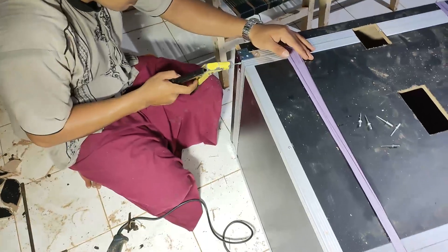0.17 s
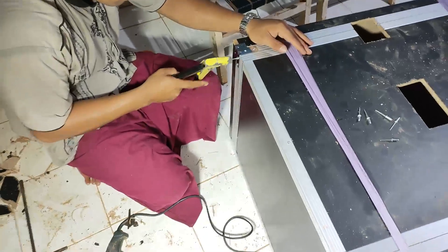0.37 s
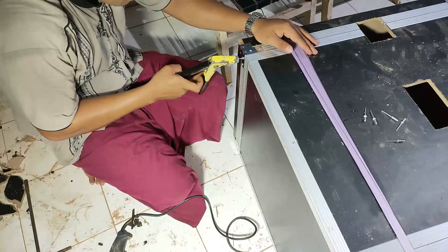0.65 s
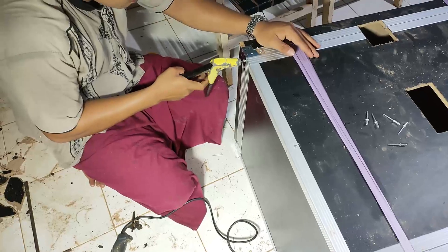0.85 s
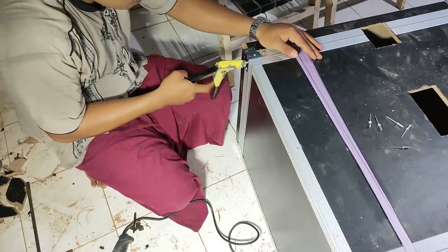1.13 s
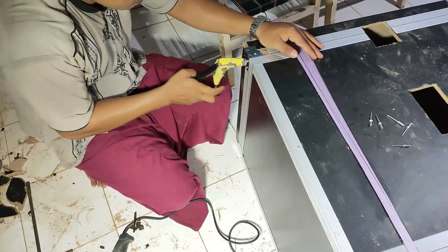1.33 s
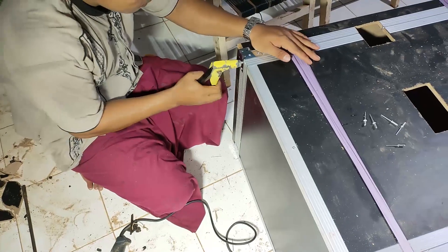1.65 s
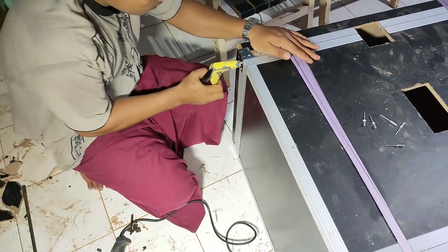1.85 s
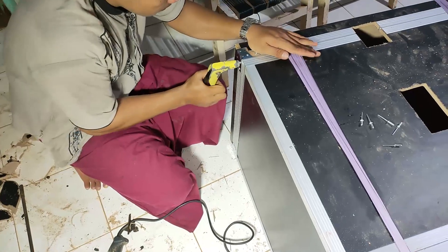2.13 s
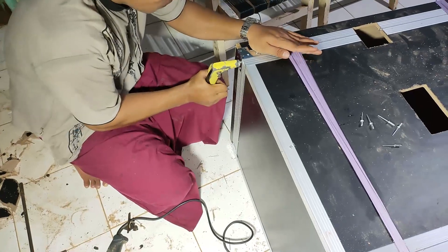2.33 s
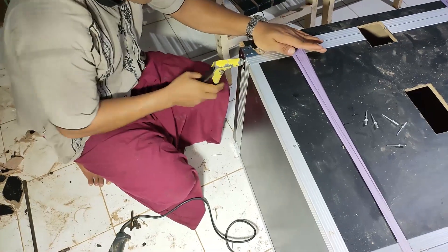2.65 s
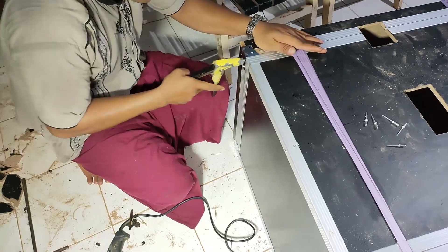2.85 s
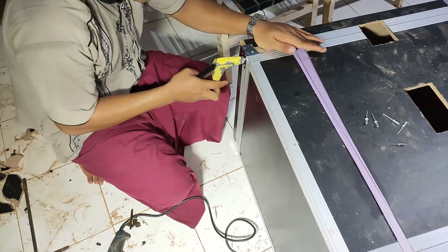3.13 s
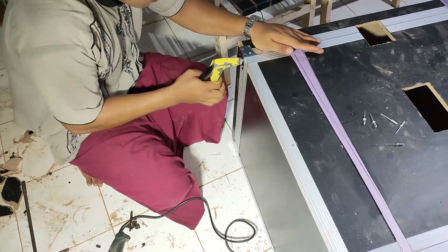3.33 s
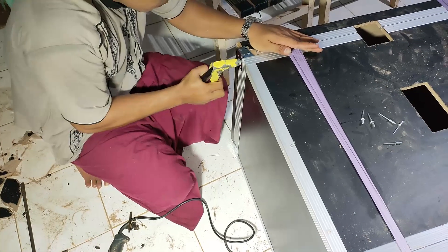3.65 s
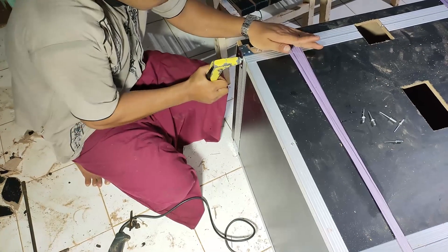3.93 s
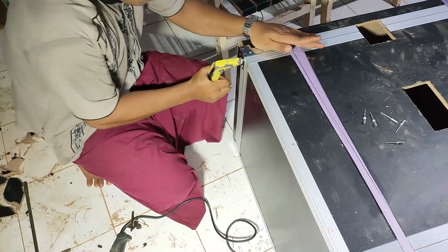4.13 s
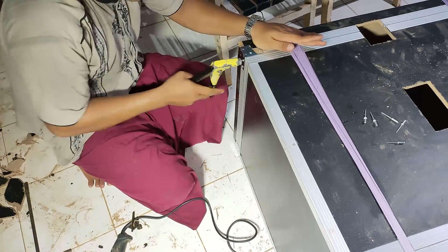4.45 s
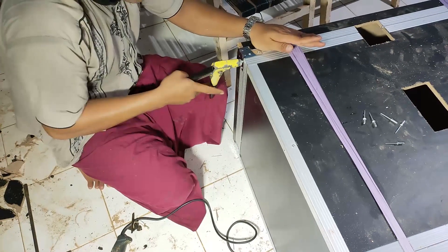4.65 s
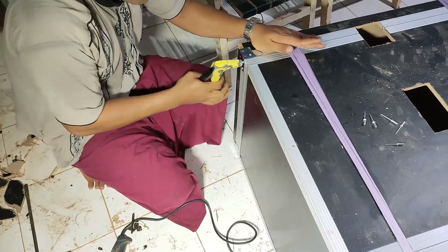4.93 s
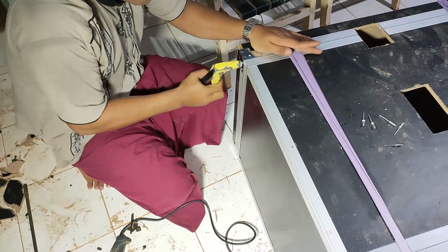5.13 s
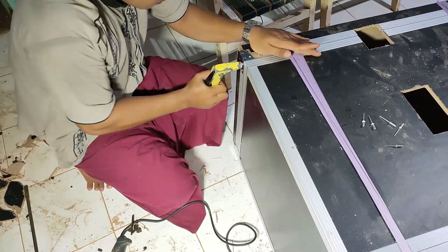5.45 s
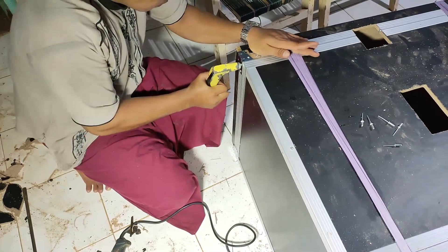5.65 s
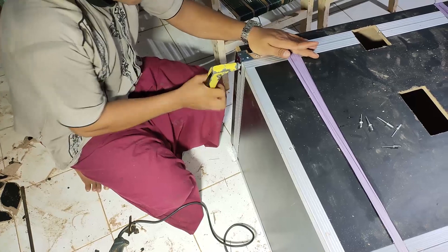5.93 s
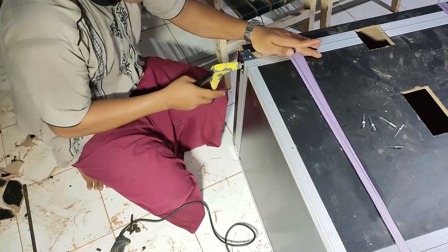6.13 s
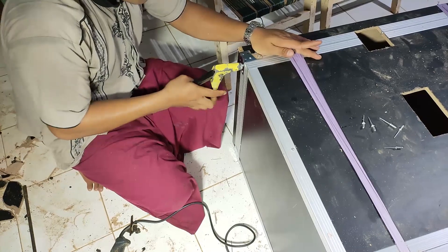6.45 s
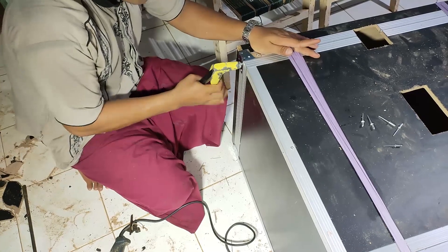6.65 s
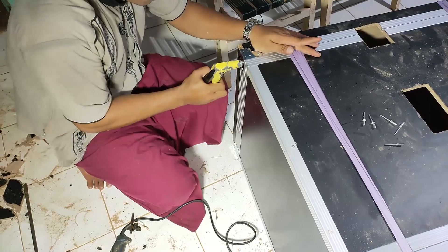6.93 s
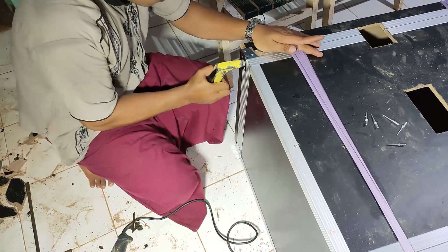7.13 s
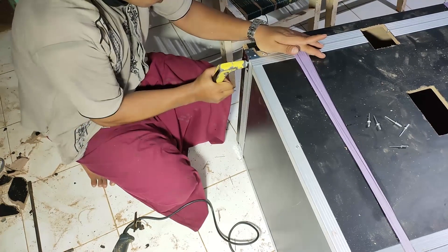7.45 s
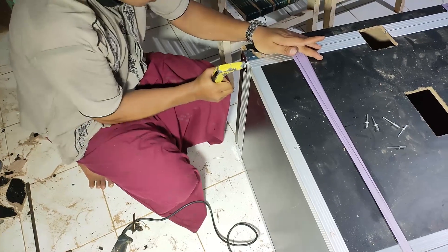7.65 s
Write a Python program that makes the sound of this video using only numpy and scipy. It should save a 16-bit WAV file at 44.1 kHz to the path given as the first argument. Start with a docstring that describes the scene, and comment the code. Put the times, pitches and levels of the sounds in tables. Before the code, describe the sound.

Indoors, close stereo, a faint narrow high hiss like insects and quiet room air run throughout. At 0.1 and 0.3 seconds come firm metallic clacks, with finger rustle and a thin, very high pin jingle to the right until 0.9. From 1 to 2 seconds there are small dry ticks, clustered around 1.4 to 1.7. Clanky clicks gather from 2.4, ending in a stronger clack at 3.0. At 3.5 a dull, hollow panel thump booms, with faint high squeaks around 3.6 to 4.3. A click falls at 4.2, then a rapid clatter at 4.6 to 4.8 leads to a very loud, bright snap at 4.9. Soft pushes, rubbing and a faint squeak follow near 5.4, with clicks at 5.9. Clicks from 6.3 precede a second equally loud snap at 6.6. Afterwards only a soft push, a weak squeak, tiny ticks around 7.2 and light clicks at 7.4 and 7.6 remain.

```python
"""Hand rivet tool on a hollow cabinet

A hand rivet tool is squeezed against a metal edge profile on a hollow cabinet, indoors.
Jaws, handles and mandrel click and snap: noise bursts through resonances, with rattle and room tail.
The panel booms and a thin pin rings as decaying sines; the hand rubs as grainy noise; the pivot squeaks
as gliding tones. A band of insect-like hiss and quiet room air, both shaped noise, lie under it."""
import sys
import numpy as np
from scipy import signal
from scipy.fft import rfft, irfft
from scipy.io import wavfile
from scipy.ndimage import uniform_filter1d

SR = 44100
rng = np.random.default_rng(int(sys.argv[2]) if len(sys.argv) > 2 else 0)


def wav_out(sig):
    """Save sig, one row per channel (or a flat mono array), as 16-bit PCM at SR to the path in sys.argv[1]."""
    wavfile.write(sys.argv[1], SR, np.round(np.clip(np.atleast_2d(sig).T, -1, 1) * 32767).astype(np.int16))


N = 343098


def gain_of(db):
    """Decibels to amplitude."""
    return np.exp(np.asarray(db) * (np.log(10) / 20))


def evened(x):
    """Scales to rms 1."""
    return x / np.sqrt(np.mean(x ** 2) + 1e-20)


def smooth_noise(shape, size):
    """Noise of rms 1, averaged over size steps of the last axis."""
    return evened(uniform_filter1d(rng.standard_normal(shape), size=size))


def read(points, hz):
    """Reads a table on a log-frequency axis."""
    f, value = np.transpose(points)
    return np.interp(np.log(hz + 1), np.log(f + 1), value)


def add(mix, s, sound):
    """Mixes a sound in at time s."""
    part = mix[..., round(s * SR):][..., :sound.shape[-1]]
    part += sound[..., :part.shape[-1]]


def sides(db):
    """Left and right gains for a left-right difference."""
    return gain_of(np.array([db / 2, -db / 2]))


def stereo(left, other, same, hz):
    """Left and right spectra that share as much as the likeness table says."""
    like = np.clip(read(same, hz), -1, 1).reshape((-1,) + (1,) * (left.ndim - 1))
    return np.array([left, like * left + np.sqrt(1 - like ** 2) * other])


def hiss(spectrum, same, balance, patchy_db, size):
    """Two-channel noise of rms 1 with drifting patches in time and pitch."""
    hop, hz = size // 4, np.fft.rfftfreq(size, 1 / SR)
    a, b, c, d, patches = rng.standard_normal((N // hop + 5, len(hz), 5)).T
    patches = uniform_filter1d(patches, size=9, axis=0)
    patches = evened(uniform_filter1d(patches, size=9, axis=1))
    z = stereo(a + 1j * b, c + 1j * d, same, hz)
    z = z * gain_of(read(spectrum, hz)[:, None] + patchy_db * patches)
    z = z * sides(read(balance, hz))[:, :, None]
    return evened(signal.istft(z, nperseg=size, noverlap=size - hop)[1][:, :N])


BUILD_CYCLES, SLUGGISH_HZ = 0.59, 88  # cycles a mode needs to build; modes under this pitch need more


def ring(modes, db, scatter_db):
    """One blow on a set of decaying modes; where it lands changes each mode's share."""
    t = np.arange(2 * SR // 5) / SR
    hz, mode_db, t60_s = np.transpose(modes)[:, :, None]
    share_db = db + mode_db + scatter_db * rng.standard_normal(hz.shape)
    build_s = BUILD_CYCLES * (1 + (SLUGGISH_HZ / hz) ** 2) / hz
    swell = (1 - np.exp(-t / build_s)) ** 2
    return (gain_of(share_db - 60 * t / t60_s) * swell * np.sin(2 * np.pi * hz * t)).sum(0)


# room air spectrum: (frequency [Hz], relative density [dB/Hz])
AIR_SPECTRUM = [(26, -24), (45, -5.5), (130, -14), (290, -19), (465, -13), (550, -4.5), (680, -11),
                (800, -18), (1400, -20.5), (2200, -7), (2900, -19), (4100, -57), (9000, -30.5),
                (15800, -25)]
# background likeness of the channels: (frequency [Hz], likeness [-1..1])
AIR_LIKENESS = [(60, 1), (300, 0.57), (700, 0.14), (1400, 0.018)]
# background balance: (frequency [Hz], left-right difference [dB])
AIR_TILT = [(60, -5), (550, 1.5), (1650, -4.5), (4500, 0.5), (6500, -3.5), (9000, -7.5), (14000, 2)]
AIR_DB = -58


def room_air():
    """Steady shaped noise, slightly patchy."""
    return gain_of(AIR_DB) * hiss(AIR_SPECTRUM, AIR_LIKENESS, AIR_TILT, patchy_db=2.2, size=1024)


# insect-like hiss spectrum: (frequency [Hz], relative density [dB/Hz])
BAND_SPECTRUM = [(5200, -20), (5700, -7.5), (6250, 0), (6700, 2), (7400, 1.5), (7750, -8), (8100, -22),
                 (8600, -45)]
BAND_DB = -49.5


def hiss_band():
    """Steady noise confined to a narrow treble band."""
    return gain_of(BAND_DB) * hiss(BAND_SPECTRUM, AIR_LIKENESS, AIR_TILT, patchy_db=1.8, size=1024)


# room decay: (frequency [Hz], t60 [s])
ROOM_T60 = [(300, 0.19), (1800, 0.32), (5000, 0.36), (13000, 0.2)]


def room(x):
    """Dense taps of random sign in clumps and patches of pitch, each band dying at its own speed."""
    taps = rng.standard_normal((2, SR // 2))
    taps = taps * gain_of(1.2 * smooth_noise(taps.shape, 130))
    taps = taps * np.clip((np.arange(SR // 2) / SR - .004) / 0.00044, 0, 1)  # silent for 4 ms
    hz, t, z = signal.stft(taps, SR, nperseg=256)
    patches = uniform_filter1d(rng.standard_normal(z.shape), size=3, axis=1)
    patches = evened(uniform_filter1d(patches, size=5, axis=2))
    decay = gain_of(3.5 * patches - 60 * t / read(ROOM_T60, hz)[:, None])
    tail = signal.istft(z * decay, SR, nperseg=256)[1]
    tail = tail / np.linalg.norm(tail, axis=1, keepdims=True)
    return signal.fftconvolve(x, tail, axes=1)[:, :N]


# cabinet panel modes: (frequency [Hz], relative level [dB], t60 before damping [s])
PANEL_MODES = [(54.4, 4, 0.39), (66.4, -10, 0.52), (85.8, -4.5, 0.46), (110.6, -2, 0.27), (126.6, 6, 0.2),
               (179, -14.5, 0.29), (243, -16.5, 0.37), (281, -1.5, 0.21), (347.7, -4, 0.11),
               (367.3, -12.5, 0.34), (436.7, -4, 0.16), (481.5, -16, 0.52), (541.5, -2, 0.085),
               (681, -9, 0.24), (828, -7, 0.099)]
DAMPING, HARDEST_DB = 0.12, -19  # dB of ring time lost per dB of boxy level below HARDEST_DB
BOOM_SCATTER_DB = 1.8


def boom(deep_db, boxy_db, lowest_db=0, upper_db=-8.0):
    """A blow shared among lowest, deep, boxy and upper panel modes; weak blows die sooner above 100 Hz."""
    hz = np.transpose(PANEL_MODES)[0][:, None]
    shares = [(70, deep_db + lowest_db), (110, deep_db), (140, deep_db),
              (200, boxy_db), (300, boxy_db), (430, boxy_db + upper_db)]
    lasting = gain_of(DAMPING * np.clip(boxy_db - HARDEST_DB, -30, 0))
    modes = [(f, db, t60_s * (lasting if f > 100 else 1)) for f, db, t60_s in PANEL_MODES]
    return ring(modes, read(shares, hz), scatter_db=BOOM_SCATTER_DB)


def shaken(steady_db, blows_db, db, rise_s, t60_s):
    """Gain over time: the hand's steady level plus, in power, a swell and decay after each click."""
    t, power = np.arange(SR) / SR, gain_of(steady_db) ** 2
    shape = (1 - np.exp(-t / rise_s)) * gain_of(db - 60 * t / t60_s)
    for (s, *_), blow_db in zip(CLICK_EVENTS, blows_db):
        add(power, s, (gain_of(blow_db) * shape) ** 2)
    return np.sqrt(power)


# steady hand noise on tool and cabinet: (time [s], palm drag level [dB], finger rustle level [dB])
HAND_LEVELS = [(0.0, -55, -46.5), (0.119, -69, -50), (.26, -57, -49), (.55, -67.5, -61), (1.15, -65.5, -61),
               (1.34, -78, -49), (1.6, -90, -50.5), (1.9, -61, -56.5), (2.25, -63.5, -56.5),
               (2.6, -64.5, -67), (2.9, -49.5, -56.5), (3.3, -64, -61.5), (3.65, -62, -51.5),
               (3.96, -65, -62), (4.58, -63, -61.5), (4.61, -54, -60), (4.66, -58, -61), (4.81, -57, -71),
               (5.1, -55.5, -67), (5.4, -67, -60), (5.45, -54.5, -55), (5.61, -57, -58),
               (5.701, -66.5, -64.5), (6.2, -64, -61.5), (6.33, -56, -55), (6.5, -52.5, -55),
               (7.21, -64.5, -63.5), (7.4, -69, -65), (7.78, -61, -68)]
# palm drag spectrum: (frequency [Hz], relative density [dB/Hz])
DRAG_SPECTRUM = [(88, -46), (150, -17.5), (254, -8.5), (836, -17), (1500, -22.5), (1860, -24), (2670, -24),
                 (5500, -34), (7150, -49), (12100, -120)]
# finger rustle spectrum: (frequency [Hz], relative density [dB/Hz])
RUSTLE_SPECTRUM = [(1500, 3), (3000, -0.5), (6000, 5), (10000, 5), (15000, 2.5)]
# likeness of the channels, rustle, drag and clicks: (frequency [Hz], likeness [-1..1])
NEAR_LIKENESS = [(300, 0.71), (1400, 0.24), (3000, 0.088), (15000, 0.016)]
# balance of rustle and clicks: (frequency [Hz], left-right difference [dB])
NEAR_TILT = [(300, -5), (650, -1), (1300, -2.5), (3200, -2.5), (4500, 1.5), (6500, -9.5), (9000, 6.5),
             (14000, -4.5)]
CREAK_DB, CREAK_SLOPE = -68, 1.37  # creak at a palm drag of -62 dB; dB per dB of drag


def hand():
    """Pressure creaks in the panel modes; palm and fingers catch and slip in grains."""
    s, *levels = np.transpose(HAND_LEVELS)
    drag_db, rustle_db = (np.interp(np.arange(N) / SR, s, c) for c in levels)
    creak_db = CREAK_DB + CREAK_SLOPE * (drag_db + 62)
    _, peak_db, _, _, _, boxy_db, *_ = np.transpose(CLICK_EVENTS)
    panel = boom(-28.5, -26.5, upper_db=-16.0)[:SR // 8]
    creak = signal.oaconvolve(rng.standard_normal(N), panel)[:N]
    slip_db = 2.2 * smooth_noise(N, 70)
    grain = smooth_noise(N, 70)
    grain_db = 0.3 * grain + 2.7 * np.maximum(grain - 1, 0)
    drag = hiss(DRAG_SPECTRUM, NEAR_LIKENESS, [(1, -1.), (2, 0.72)], patchy_db=3.0, size=512)
    rustle = hiss(RUSTLE_SPECTRUM, NEAR_LIKENESS, NEAR_TILT, patchy_db=4.5, size=256)
    drag, rustle = gain_of(slip_db) * drag, gain_of(grain_db) * rustle
    creak_gain = shaken(creak_db, boxy_db, db=-10, rise_s=0.027, t60_s=0.43)
    drag_gain = shaken(drag_db, peak_db, db=-37, rise_s=0.002, t60_s=0.46)
    rustle_gain = shaken(rustle_db, peak_db, db=-32.5, rise_s=0.0087, t60_s=0.4)
    return creak_gain * evened(creak) + drag_gain * evened(drag) + rustle_gain * evened(rustle)


ARCH_FLATNESS = 3.8  # power of the pitch arch
SQUEAK_FADE, SQUEAK_FLICKER_DB = 0.11, 4  # share of the length spent fading; rms flicker


def whistle(length_s, first_hz, last_hz, arch_hz, db, waver):
    """A thin tone arching over a straight glide, its pitch wavering and its level flickering."""
    u = np.arange(0, length_s, 1 / SR) / length_s
    arch = 1 - abs(2 * u ** .85 - 1) ** ARCH_FLATNESS
    hz = first_hz + (last_hz - first_hz) * u + arch_hz * arch
    wobble = 1 + waver * (smooth_noise(len(u), 60) + .4 * smooth_noise(len(u), 1500))
    x = np.sqrt(2) * np.sin(2 * np.pi * np.cumsum(hz * wobble) / SR)
    flicker_db = SQUEAK_FLICKER_DB * smooth_noise(len(u), 500)
    return gain_of(db + flicker_db) * x * signal.windows.tukey(len(u), SQUEAK_FADE)


# squeaks as the handles close: (start [s], length [s], first pitch [Hz], last pitch [Hz],
# arch height [Hz], level [dB], quick pitch waver [share of pitch])
SQUEAKS = [(3.58, .22, 12000, 15200, 500, -65, 0.016), (3.92, 0.38, 8500, 9200, 3550, -64.5, 0.0089),
           (5.42, 0.23, 10000, 11600, 900, -68, .022), (6.97, 0.18, 9900, 10200, 450, -69, 0.031)]


def pivot():
    """Faint friction squeaks, slightly right of centre."""
    out = np.zeros(N)
    for s, *row in SQUEAKS:
        add(out, s, whistle(*row))
    return out * sides(-0.97)[:, None]


# loose mandrel jingling in the nose: (time [s], level [dB])
JINGLE_EVENTS = [(0.15, -41), (.175, -45), (0.427, -34.5), (0.663, -39), (.74, -46), (0.802, -46),
                 (.855, -55)]
# mandrel modes: (frequency [Hz], relative level [dB], t60 [s])
PIN_MODES = [(15610, -3, 0.09), (15540, 0, .14), (15470, -4, .11), (15050, -16, 0.05)]
# faint short tones of the mandrel and other metal parts: (time [s], level [dB], frequency [Hz], t60 [s])
TING_EVENTS = [(.428, -43, 5830, .25), (.976, -50, 2180, 0.38), (1.7, -45, 2750, 0.13),
               (2.25, -57, 1670, 0.15), (2.26, -60, 3200, .1), (3.82, -57, 765, 0.47),
               (6.283, -51, 1135, .1), (6.8, -55, 1430, 0.18), (7.15, -49, 1950, 0.087),
               (7.189, -55, 1950, .08), (7.219, -53, 1950, .08), (7.259, -58, 1950, .08)]
PIN_ROOM_DB = -1.5


def mandrel():
    """The thin steel pin rings high, mostly right; it and other metal parts ting faintly; all rattle."""
    pin, tings = np.zeros(N), np.zeros(N)
    for s, db in JINGLE_EVENTS:
        add(pin, s, ring(PIN_MODES, db, scatter_db=1.5))
    for s, db, hz, t60_s in TING_EVENTS:
        add(tings, s, ring([(hz, 0, t60_s)], db, scatter_db=1.2))
    flutter = gain_of(3 * smooth_noise(N, 250))
    pin = pin * flutter * sides(-14.0)[:, None]
    return pin + gain_of(PIN_ROOM_DB) * room(pin) + tings * flutter * sides(-7.0)[:, None]


RATTLE_DB, RATTLE_T60_S, BOUNCES_PER_S = -5, 0.12, 450  # level against the pulse; decay; rate per draw
RATTLE_TINT_DB = 5  # rms spread of the tint


def rattle(pulse):
    """Loose parts make uneven small bounces after a click; each rattle favours its own few short rings."""
    t = np.arange(SR // 10) / SR
    chance, size, sign = rng.random((3, 2, len(t)))
    hits = (chance < BOUNCES_PER_S / SR) * (t > .007) * np.sign(sign - .5)
    bounces = hits * gain_of(-60 * t / RATTLE_T60_S - 16 * size)
    bounces = bounces + 0.6 * bounces[::-1]  # each side leaks into the other
    tint = evened(gain_of(RATTLE_TINT_DB * smooth_noise(513, 7)))
    return gain_of(RATTLE_DB) * signal.fftconvolve(bounces, irfft(rfft(pulse) * tint), axes=1)


# resonances of profile and tool head: (frequency [Hz], width, at least 120 used [Hz], level [dB])
PROFILE_RINGS = [(1340, 83, 0), (1707, 285, 4.5), (2285, 470, 3.5), (2920, 390, -8.5), (3310, 200, -8.5),
                 (3900, 53, -11), (4350, 230, -13), (4860, 130, 0.5), (5590, 73, 2.5), (6500, 110, 2.5),
                 (7360, 640, 3), (9400, 360, -4.5), (10200, 260, -11), (14600, 240, -5)]
# colour shared by all clicks: (frequency [Hz], level [dB])
CLICK_COLOUR = [(850, 0), (1200, -2.5), (2000, -4), (3200, 2), (4200, 5), (5500, 2.6), (8000, 6),
                (13000, 5)]
# colour shift of blows above HARD_DB: (frequency [Hz], slope [dB per dB of excess])
HARD_COLOUR = [(900, -0.28), (1400, 0.65), (2200, -0.54), (3150, -0.26), (4100, -0.19), (5200, 0.22),
               (7000, 0.35), (7900, -0.27), (9000, 0.055), (14000, 0.64)]
HARD_DB = -11.5
CHATTER_STOP = 1.7  # how abruptly the chatter ends, as a power of its time
RING_SHARPNESS = 4.8  # pitch over width of the favoured ring
TAIL_RING = 0.15  # extra favoured ring in the tail, as a power of its lift


def click(peak_db, clank_db, fizz_db, tick_db, ring_hz, ring_db):
    """A hard tick and a few ms of metal chatter ring the profile; also the plain pulse that feeds the room."""
    t, hz = np.arange(1024) / SR, np.fft.rfftfreq(1024, 1 / SR)
    u = np.maximum(t - .002, 0) / (0.0031 * gain_of(0.025 * peak_db))  # hard blows chatter longer
    chatter, tick, jolts = rng.standard_normal((3, 2, 1024))
    chatter = evened(chatter * gain_of(3 * jolts[0]) * u * np.exp(-u ** CHATTER_STOP / CHATTER_STOP))
    tick_s = .0032 + 0.00216 * gain_of(0.32 * peak_db)
    tick = gain_of(tick_db) * evened(tick * np.exp(-abs(t - tick_s) / .0001))
    left, other = rfft(chatter + tick)
    z = stereo(left, other, NEAR_LIKENESS, hz)
    z = z / np.sqrt(uniform_filter1d(abs(z) ** 2, size=21, axis=1))  # even drive at all pitches
    body = 0.95 + sum(gain_of(db) / (1 + 2j * (hz - f) / max(w, 120)) for f, w, db in PROFILE_RINGS)
    # where it lands favours one ring
    lift = 1 + gain_of(ring_db) / (1 + 2j * RING_SHARPNESS * (hz / ring_hz - 1))
    lean = [(1040, clank_db), (3030, 0), (4340, 0), (12100, fizz_db)]
    hard_db = max(peak_db - HARD_DB, 0) * read(HARD_COLOUR, hz)
    body = body * lift * gain_of(read(CLICK_COLOUR, hz) + read(lean, hz) + hard_db)
    body = body * hz ** 4 / (hz ** 4 + 820.0 ** 4) / np.sqrt(hz + 1)  # low cut, then -3 dB/octave
    body = gain_of(peak_db + 12.5) * body / np.linalg.norm(irfft(body)) * sides(read(NEAR_TILT, hz))
    pulse = irfft(body * lift ** TAIL_RING * np.exp(-2j * np.pi * hz * .004))  # 4 ms late
    return irfft(z * body), pulse


# clicks and snaps: (time [s], nominal peak [dB], clank against middle [dB], fizz against middle [dB],
# deep panel blow [dB], boxy panel blow [dB], tick against chatter [dB], room and rattle send [dB],
# favoured ring [Hz], its lift [dB], lowest against deep modes [dB], upper against boxy modes [dB])
CLICK_EVENTS = [(.111, -14, -0.5, -2.5, -56, -37.5, -8, -3.5, 3380, 2, 2, -27),
                (0.331, -11, -3, 1.5, -48, -38.5, 3, -1.5, 8200, -6, -19, -1.5),
                (.375, -18.5, 2, -50, -79, -46, 0, -5, 2000, -18, 0, 4),
                (0.427, -24.5, 3, 24, -78, -61, -3, -11, 10500, 1, 0, 0),
                (0.434, -28.5, 3, -2, -75, -60, -10, -4, 10500, -10, 0, 3),
                (0.659, -30.5, 1, 11, -67, -58, -9, 1.5, 7000, -27, 0, 3),
                (.8, -34.5, 8, 18, -61, -76, 0, -2, 8500, -8, 2, -12),
                (.965, -25.5, 3, 2, -64, -68, 4, -2, 8400, 6, 6, -12),
                (.974, -35.5, -5, 4, -77, -70, -5, 7, 2100, -10, -2, -6),
                (1.14, -35.5, -13, 0, -63, -59, 9, -6, 8700, 18, 7, -7),
                (1.281, -36, -14, -3, -73, -81, 0, 2, 7500, 14, 2, -12),
                (1.414, -37.5, -10, 0, -85, -77, -1, 2, 5500, 2, 0, -5),
                (1.436, -27, 8, 13, -87, -77, -6, -1, 11500, 1, 0, -2),
                (1.458, -28, -39, 3.5, -85, -79, -8, 3, 6500, 1, 0, -5),
                (1.587, -25, -19, 3.5, -77, -76, -1, -4, 7100, -18, 0, -9),
                (1.604, -33.5, -15, -3, -80, -77, 0, 1, 7040, -1, 0, -5),
                (1.629, -32, -12, 6, -80, -77, -3, 2, 14000, 3, 0, -5),
                (1.637, -33.5, -8, 6, -60, -71, 0, 4, 7000, -12, -6, -12),
                (1.69, -22, -25, 3, -80, -71, 3, -6, 2640, 6, 0, -3),
                (1.703, -30.5, -22, 7, -78, -77, -8, 2, 8540, 7, 0, -5),
                (1.867, -35.5, -1, -8, -69, -46.5, 0, -3, 2210, -11, -2, 4),
                (1.921, -30.5, -24, 0, -66, -65, -20, -6, 7000, -26, 5, -10),
                (1.974, -33.5, -4, 9, -56, -63, -4, -15, 7000, -13, 7, -12),
                (2.448, -25.5, 9.5, 2.5, -41.5, -34, -4, 1, 2650, -7, 2, -4),
                (2.653, -30.5, -3, 10, -55, -62, 1, -19, 9000, -2, 0, -14),
                (2.725, -25.5, 9, 6.5, -51, -50, -5, -5, 3240, -4, -8, 7),
                (2.796, -20, 10.5, -3, -60, -34, -13, -7.5, 3080, -1, 0, 2.5),
                (2.813, -30.5, 32, 4, -55, -61, -3, -3, 900, -2, 0, -12),
                (2.845, -26.5, 9, 8, -44, -36.5, 4, -18, 5500, -11, 5, 2),
                (2.919, -34.5, -8, -10, -46, -39, -9, 1, 2000, -10, 3, -12),
                (2.982, -11.5, 8, -2.5, -34.5, -35, -2, -5, 7700, -8, -7, 1),
                (3.187, -32, -5, 13, -78, -73, -11, -24, 9000, -2, 0, -7),
                (3.376, -26, 2.5, 11.5, -63, -47, -14, 0, 4200, 4.5, -4, 1.5),
                (3.497, -20, 5.5, -4, -24.5, -16.5, -18, 0, 2100, -4, 1.5, -13.5),
                (4.241, -18, -5, -7, -57, -34.5, -30, -7.5, 1430, 5, -7, -3.5),
                (4.63, -35, 5, -8, -57, -56, -11, -4, 1510, 5, 0, 6),
                (4.645, -22.5, -2, 15, -50, -44, -15, -2, 14500, -2, 2, -11),
                (4.653, -34, 5, -10, -67, -52, -15, -2, 1700, 12, 0, -9),
                (4.66, -31.5, 5, 3, -67, -38, -7, -4, 1200, -2, 0, -5.5),
                (4.667, -31.5, 1, -6, -71, -51, -15, -4, 2210, -1, 0, -11),
                (4.682, -25.5, 15, -12, -53, -44.5, -12, -10, 1790, 5, 3, 7),
                (4.691, -29, 20, -12, -66, -67, -12, -6, 880, 2, 0, -4),
                (4.699, -39, 22, -12, -66, -53, -10, 2, 890, 5, 0, 1),
                (4.734, -22.5, 3.5, -12, -41, -38, -8, -8, 4500, -5, -7, -1.5),
                (4.744, -28.5, 11, -24, -51, -54, -5, -2, 2600, -11, -2, -6),
                (4.761, -36, 14, -12, -58, -47, 1, -10, 1200, -1, 0, 4),
                (4.852, -36, -5, -2, -56, -45, 1, 0, 3000, 3, 0, 2),
                (4.86, -24.5, 1, 0, -52, -55, -14, 3, 3020, -13, 1, -9),
                (4.876, -2.5, -5.5, 1.5, -59, -29.5, -1, -9.5, 3200, 12.5, 4, -9),
                (4.887, -23, 9, -12, -80, -60, -12, -6, 3230, 7, 0, -5),
                (5.146, -25.5, -6, 14, -55, -62, -3, -2.5, 4670, 0, 1, -12),
                (5.8555, -27, 1.5, 1.5, -58, -69, 0, -4.5, 14400, 10, 4, -6),
                (5.916, -33, -12, 1, -50, -65, -14, 2, 9000, -16, 6, -12),
                (5.952, -18.5, -8.5, -3.5, -59, -39, -3, -6, 1330, 8, 0, 2.5),
                (6.312, -28.5, 3, -18, -56.5, -47, -1, -3, 1980, 7, -8, -6),
                (6.358, -28, -7, -18, -49.5, -43, -21, -8.5, 2370, 4, 7, 0),
                (6.42, -22.5, 3, -16, -45.5, -41, -20, -3, 1720, -8, 2, 6.5),
                (6.485, -30.5, 5, 20, -56, -60, -12, -12, 11100, 13, 0, -3),
                (6.565, -2, -5.5, -5.5, -50.5, -29, -0.5, -6.5, 3300, -3, 15, 3),
                (6.795, -31.5, 2.5, 2, -69.5, -68, -12, 0.5, 1380, 1, 4, -15),
                (7.149, -43.5, -2, 3, -53, -47.5, -5, 5, 1950, -10, -2, -4),
                (7.189, -41, 10, -3, -52.5, -48, -9, -4, 1950, -7, -5, 0),
                (7.219, -40, -7, -1, -64, -45, -7, -2, 1950, 0, -2, -1.5),
                (7.258, -39.5, 3, -9, -60.5, -47, -19, -9, 1950, -3, 0, 2),
                (7.392, -29, 0.5, 3, -58, -77, -12, -1, 3100, -6, -3, -6),
                (7.636, -25.5, -4, -10, -50.5, -43.5, -5, -5.5, 1560, 4, 6.5, 0)]
# dull pushes, panel only: (time [s], reference level [dB], deep modes against it [dB],
# boxy modes against it [dB])
NUDGE_EVENTS = [(0.23, -41, -5, -27), (1.898, -53.5, 4.5, -15), (1.979, -56, -7, -16), (2.159, -46, 4, -10),
                (2.269, -46, -3, -31), (2.879, -30.5, -13, -7), (3.428, -40, -16, -7),
                (5.374, -33.5, -7, -16.5), (5.528, -43, -31, 1.5), (6.834, -33, -10.5, -5)]


def tool():
    """Clicks and snaps, their rattle and room tail, and the boom each sends into the panel."""
    near, send, panel = np.zeros((2, N)), np.zeros((2, N)), np.zeros(N)
    for (s, peak_db, clank_db, fizz_db, deep_db, boxy_db, tick_db, wet_db,
         ring_hz, ring_db, lowest_db, upper_db) in CLICK_EVENTS:
        x, pulse = click(peak_db, clank_db, fizz_db, tick_db, ring_hz, ring_db)
        add(near, s - .003, x)
        add(near, s - .003, gain_of(wet_db) * rattle(pulse))
        add(send, s - .003, gain_of(wet_db) * pulse)
        add(panel, s, boom(deep_db, boxy_db, lowest_db, upper_db))
    for s, peak_db, deep_db, boxy_db in NUDGE_EVENTS:
        add(panel, s, boom(peak_db + deep_db, peak_db + boxy_db, lowest_db=-13.0))
    far_panel = gain_of(-13) * room(panel[None])
    return near + room(send) + panel + far_panel


def scene():
    """All sources over the room air and the steady band of hiss."""
    return room_air() + hiss_band() + hand() + pivot() + mandrel() + tool()


OVERLOAD, OFFSET = .8, .00577  # full-scale units
SHELF_HZ, EDGE_HZ = 15720, 16750


def record(dry):
    """Rounds the hardest peaks, steps the top treble down, limits the band; the converter adds an offset."""
    step = gain_of(-26.0)
    taps = signal.firwin(255, SHELF_HZ, window=("kaiser", 7), fs=SR) * (1 - step)
    taps = taps + signal.firwin(255, EDGE_HZ, window=("kaiser", 9), fs=SR) * step
    rounded = OVERLOAD * np.tanh(dry / OVERLOAD)
    return OFFSET + signal.oaconvolve(rounded, taps[None], "same")


dry = scene()
out = record(dry)
wav_out(out)
```